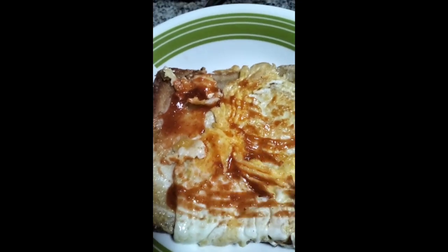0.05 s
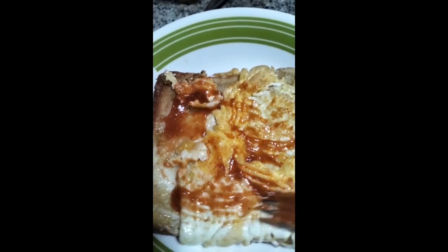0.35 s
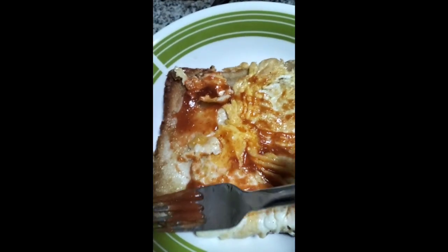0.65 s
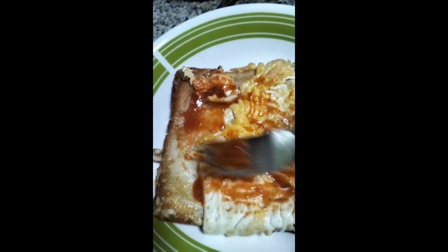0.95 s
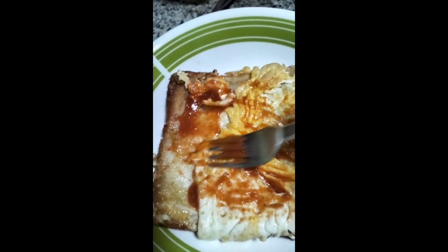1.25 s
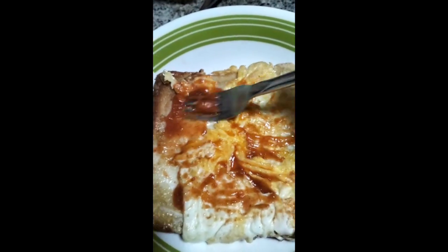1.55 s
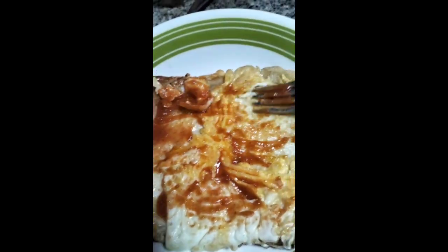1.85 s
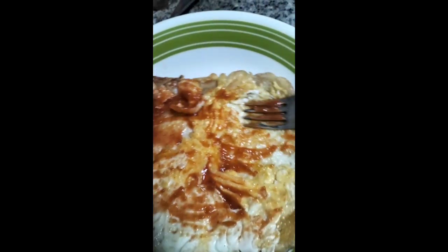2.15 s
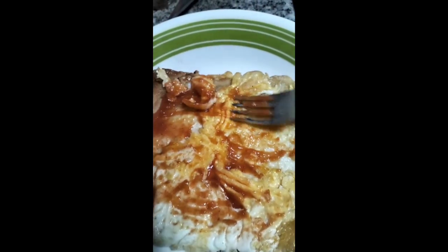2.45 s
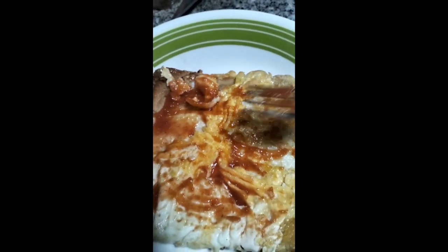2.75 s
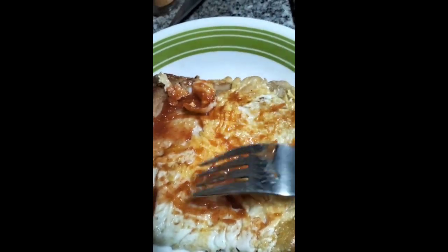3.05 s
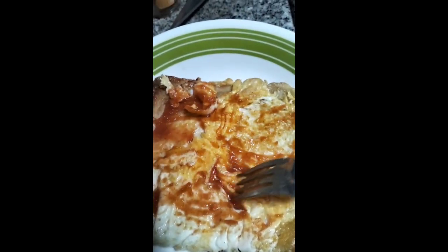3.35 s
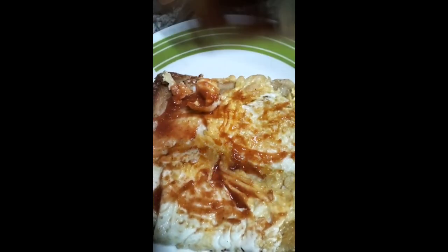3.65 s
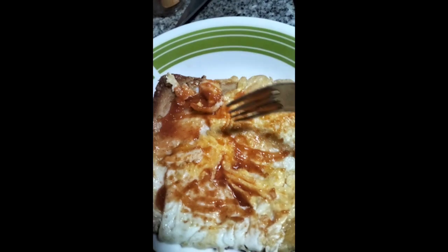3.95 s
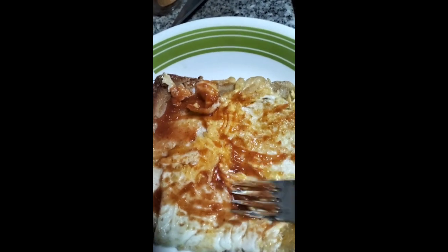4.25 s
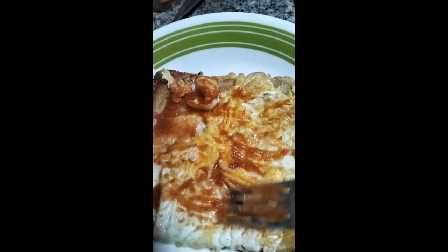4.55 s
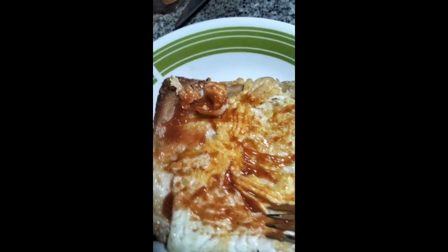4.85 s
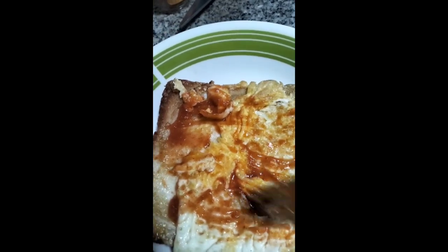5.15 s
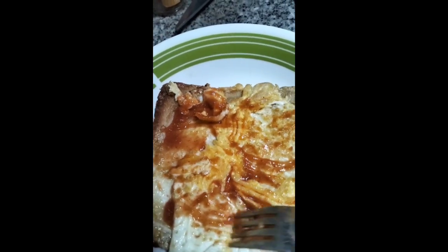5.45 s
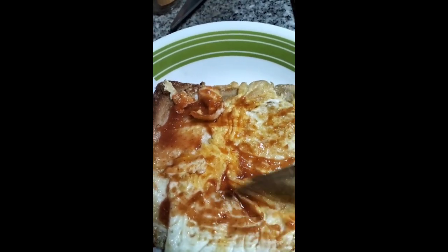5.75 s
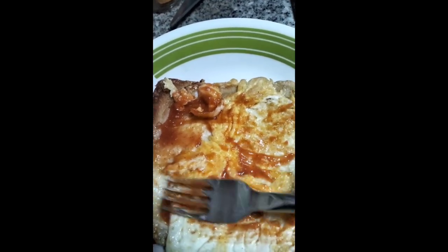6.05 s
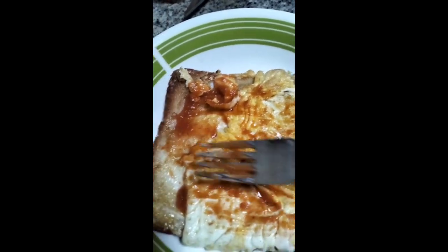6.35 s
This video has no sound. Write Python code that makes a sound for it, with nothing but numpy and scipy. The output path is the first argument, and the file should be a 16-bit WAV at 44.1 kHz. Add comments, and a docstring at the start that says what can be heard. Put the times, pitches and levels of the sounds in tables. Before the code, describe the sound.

Quiet squelches and light taps of a fork smearing sauce, with muffled knocks and a sharp clink on a ceramic plate.

```python
"""Small room, close to a ceramic plate: a fork spreads sauce over a soft, cheesy slice.
An appliance hums faintly behind. Pressing knocks the plate dully through the food; one hard fork
contact clinks and rings the plate's modes. The tines tap lightly, the sauce fizzes and squelches
under them, the food drags, and breaking sauce films give tiny wet ticks."""
import sys
import numpy as np
from scipy import signal
from scipy.fft import rfft, irfft
from scipy.io import wavfile
from scipy.ndimage import uniform_filter1d, minimum_filter1d

SR = 44100
rng = np.random.default_rng(int(sys.argv[2]) if len(sys.argv) > 2 else 0)


def transcribe(u):
    """Save the signal u as a 16-bit wav file named by the first command-line argument.

    u: samples, shape (n,) or (channels, n), limited to [-1, 1]; the rate is SR.
    q: integer samples, one column per channel.
    """
    v = np.clip(np.atleast_2d(u).T, -1, 1)
    q = np.round(v * 32767).astype(np.int16)
    wavfile.write(sys.argv[1], SR, q)


N = 291501

# plate and fork modes: f/Hz, level/dB, t60 without food damping/s, left-right/dB
PLATE_MODES = [(314.4, -38, 0.37, -0.5), (607, -29.5, 0.14, -1.5), (816, -35, 0.18, -2),
               (990, -36.5, 0.13, -7), (1186, -17, 0.13, -5.5), (1196, -23.5, 0.23, -0.5),
               (1490, -19, 0.11, 8.5), (1603, -29, 0.17, -2), (1800, -35, .14, 0), (2220, -20, .33, -6.5),
               (3127, -32.5, .28, -2.5), (4182, -31.5, .2, 1.5), (5394, -41, .17, -1), (6290, -44, .14, 3),
               (6830, -42, .16, 1), (7060, -48, .16, 0), (3167, -22.5, 0.029, -22.5), (8360, -46, 0.14, 2),
               (9290, -54, .16, 2), (9800, -48.5, .15, -3.5), (11260, -52.5, 0.11, -6.5),
               (12500, -44, 0.092, 1), (14500, -46, .16, 0)]
# strokes through the sauce: start/s, fastest/s, end/s, level/dB, drag offset/dB
FORK_STROKES = [(0, 0.068, 0.26, -69, -3), (0.466, .54, 0.69, -67.5, 4.5), (0.878, 1.0, 1.14, -65, 1.5),
                (1.31, 1.358, 1.48, -62, -2), (1.675, 1.781, 1.86, -66, -6),
                (1.824, 1.923, 2.114, -63.5, -4.5), (2.217, 2.394, 2.536, -55, -0.5),
                (2.654, 2.703, 2.95, -71.5, 5), (4.147, 4.198, 4.27, -69, 1),
                (4.847, 5.024, 5.08, -64.5, 3)]


def amp(db):
    """dB to gain."""
    return 10 ** (np.asarray(db) / 20)


def unit(x):
    """Scale to rms 1."""
    return x / np.sqrt(np.mean(x ** 2) + 1e-20)


def curve(points, hz):
    """Interpolate (f/Hz, value) points over log frequency."""
    f, value = np.transpose(points)
    return np.interp(np.log(hz + 1), np.log(f + 1), value)


def sides(pan_db):
    """Channel gains for a left-right level difference."""
    return amp(np.array([[.5], [-.5]]) * pan_db)


def add(mix, start_s, sound):
    """Mix a sound in at start_s."""
    part = mix[:, max(round(start_s * SR), 0):][:, :sound.shape[-1]]
    part += sound[..., :part.shape[1]]


def colour(x, points):
    """Filter by (f/Hz, level/dB) points."""
    hz = np.fft.rfftfreq(x.shape[-1], 1 / SR)
    return irfft(rfft(x) * amp(curve(points, hz)), x.shape[-1])


def pulse(shape_db, size=2048):
    """Minimum-phase click with spectrum shape_db(f), peak 1."""
    hz = abs(np.fft.fftfreq(size, 1 / SR))
    log_gain = np.log(amp(np.maximum(shape_db(hz), -100)))
    click = np.fft.ifft(np.exp(np.conj(signal.hilbert(log_gain)))).real[:size // 2]
    return click / abs(click).max()


def delay_right(x, lag_s):
    """Sound from the left reaches the right channel later."""
    turn = np.exp(-2j * np.pi * np.fft.rfftfreq(N, 1 / SR) * lag_s)
    return np.array([x[0], irfft(rfft(x[1]) * turn, N)])


def room(x, wet_db, early_db, early_s):
    """Direct sound, early reflections off the counter and nearby things, short stereo tail."""
    # reverberation: f/Hz, t60/s
    decay = [(150, 0.21), (500, 0.271), (1200, 0.19), (3000, 0.18), (7000, 0.19), (15000, 0.22)]
    age = np.arange(SR // 2) / SR
    echoes = rng.choice([-1., 1.], (2, len(age))) * (rng.random((2, len(age))) < .12)
    early = rng.standard_normal(echoes.shape) * np.exp(-age / early_s) * (age > .0015)
    build_up = np.clip(age / 0.0093 - .3, 0, 1)
    hz, t, spectra = signal.stft(echoes * build_up, SR, nperseg=256)
    fade = amp(-60 * t / curve(decay, hz)[:, None])
    tail = signal.istft(spectra * fade, SR, nperseg=256)[1][:, :len(age)]
    response = amp(wet_db) * tail / np.linalg.norm(tail[0])
    response += amp(early_db) * early / np.linalg.norm(early[0])
    return x + signal.fftconvolve(x, response, axes=1)[:, :N]


def appliance(air_db=-59, pan_db=-2, left_lag_s=0.00043):
    """Steady air noise, alike in both channels in the bass, with drone bands and a weak hum."""
    # room noise: f/Hz, relative level/dB
    air_spectrum = [(15, -38.5), (25, -17), (108, -3), (153, -7), (190, -5.5), (326, -7.5), (476, -12),
                    (641, -11), (695, -4.5), (863, -18.5), (1480, -16), (2160, -24.5), (8140, -48),
                    (14000, -36), (16000, -37)]
    # likeness of the channels: f/Hz, correlation
    coherence = [(60, 0.92), (130, 0.82), (290, 0.97), (640, -0.37), (1410, -0.087), (3100, 0.13),
                 (6820, 0.0051), (15000, -0.092)]
    # drone bands: f/Hz, width/Hz, level re room noise/dB
    drone_bands = [(125, 24, 4.5), (240, 15, 3), (331.7, 17, 7), (678, 51, 6.5), (1078, 480, 4),
                   (1494, 17, 12), (3160, 350, 5.5), (4520, 820, 3.5)]
    # hum lines: f/Hz, level/dB, left-right/dB
    hum_lines = [(100.6, -70.5, 5), (198.2, -69, 5), (246, -76, 1), (330, -70.5, 3.5),
                 (704.4, -64.5, -10.5), (916, -76.5, -5), (1155, -78, 10.5), (1515, -77, -10)]
    hz, t = np.fft.rfftfreq(N, 1 / SR), np.arange(N) / SR
    left, other = rfft(rng.standard_normal((2, N)))
    same = curve(coherence, hz)
    right = same * left + np.sqrt(1 - same ** 2) * other
    noise = np.array([left, right]) * amp(curve(air_spectrum, hz))
    drone_power = sum(amp(db) ** 2 / (1 + (2 * (hz - f) / width) ** 2) ** 1.8
                      for f, width, db in drone_bands)
    air = amp(air_db) * irfft(noise * np.sqrt(1 + drone_power), N) / irfft(noise, N).std()
    arrival = t - np.array([[left_lag_s], [0]])
    hum = sum(sides(pan) * amp(db) * np.sqrt(2) * np.sin(2 * np.pi * (f * arrival + rng.random()))
              for f, db, pan in hum_lines)
    return sides(pan_db) * (air + hum)


def plate_ring(corner_hz, damping, bass_hz=260):
    """Modes after one blow: a soft blow misses the high ones, food damps them."""
    t = np.arange(SR // 2) / SR
    tone = np.zeros((2, len(t)))
    for hz, db, t60, pan in PLATE_MODES:
        mode = amp(db - 60 * t * damping / t60) * np.sin(2 * np.pi * hz * t)
        tone += sides(pan) * mode / (1 + (hz / corner_hz) ** 4)
    # a small plate radiates almost no bass
    return signal.sosfilt(signal.butter(2, bass_hz, "highpass", fs=SR, output="sos"), tone)


def plate_gain_db(hz, width=0.018, valley_db=-12):
    """A crack's treble gathers at the modes; lower down, food and counter keep it broad."""
    peaks = sum(1 / (1 + ((hz - f) / (width * f)) ** 2) ** 2 for f, *_ in PLATE_MODES)
    treble = np.clip((hz - 4300) / 900, 0, 1)
    return treble * 10 * np.log10(amp(valley_db) ** 2 + peaks)


def plate_knocks(ring_db=-7, damping=1.6, cushion=0.43):
    """Dull blows through the food, each with a short, dark ring."""
    # cushioned blows: t/s, level/dB, low-pass corner/Hz, left-right/dB
    blows = [(0.4378, -41, 1400, 5), (0.4639, -21.5, 2000, 3.5), (0.5518, -33, 1480, -5.5),
             (0.5575, -35, 1260, 7), (1.29, -46, 1400, 5), (1.3615, -46, 890, 8), (1.6772, -41, 900, 2),
             (4.4618, -20.5, 2700, -0.5), (4.4838, -30.5, 1600, -1), (4.8166, -28.5, 1900, 2.5)]
    # blow spectrum before the low-pass: f/Hz, level/dB
    spectrum = [(80, -28), (250, -5), (480, -5.5), (660, 10), (950, 7), (1300, 6), (1900, 1.5), (2700, -11),
                (5000, -13.5), (8000, -17), (15000, -12)]
    out = np.zeros((2, N))
    for s, db, corner_hz, pan in blows:
        blow = pulse(lambda f: curve(spectrum, f) - 10 * np.log10(1 + (f / corner_hz) ** 2))
        add(out, s, amp(db) * sides(pan) * blow)
        add(out, s, amp(db + ring_db) * sides(pan) * plate_ring(corner_hz * cushion, damping))
    return room(out, wet_db=-6.5, early_db=-0.5, early_s=0.0039)


def fork_clink(crack_db=-1):
    """The fork hits and chatters; the hardest contact rings the plate."""
    # hard fork-plate contacts: t/s, level/dB, left-right/dB
    contacts = [(5.045, -2, 2), (5.05, -1.5, -9), (5.0530, -4.5, -3.5), (5.0571, -9.5, 3),
                (5.067, -15, -1.5), (5.105, -23, 4)]
    # broad spectrum of a contact: f/Hz, level/dB
    spectrum = [(40, -48.5), (140, -35), (280, -19), (500, -2), (1100, 5), (1700, 1.5), (2500, -5.5),
                (3400, -13), (4600, -19), (6800, -21.5), (8000, -27), (12500, -18.5), (14800, -22),
                (15800, -41)]
    cracks, tone = np.zeros((2, N)), np.zeros((2, N))
    crack = pulse(lambda f: curve(spectrum, f) + plate_gain_db(f))
    for s, db, pan in contacts:
        add(cracks, s, amp(db + crack_db) * sides(pan) * crack)
    hardest_s = max(contacts, key=lambda row: row[1])[0]
    add(tone, hardest_s, plate_ring(corner_hz=30000, damping=1))
    tone = delay_right(tone, lag_s=.00024)  # the rim lies further left than the tines
    return (room(cracks, wet_db=-8.5, early_db=-7.5, early_s=0.0032)
            + room(tone, wet_db=-16.5, early_db=-22, early_s=.009))


def snaps(rows, gain_db, spray_db, spray_s, q, pan_db):
    """Per (t/s, level/dB, f/Hz) row: one broad resonant click, then a spray of smaller ones."""
    out, t = np.zeros((2, N)), np.arange(SR // 50) / SR
    for s, db, hz in rows:
        click = pulse(lambda f: -10 * np.log10(1 + (q * (f / hz - hz / (f + 1))) ** 2))
        spray = rng.standard_normal((2, len(t))) * np.exp(-t / spray_s)
        spray *= amp(spray_db) / np.linalg.norm(spray, axis=1, keepdims=True)
        spray[:, 0] = 1  # leading click
        snap = signal.fftconvolve(spray, click[None], axes=1)
        add(out, s, amp(db + gain_db) * sides(pan_db) * snap / abs(snap).max())
    return out


def tine_taps():
    """The tines touch down with light, dry taps."""
    # taps: t/s, level/dB, centre f/Hz
    taps = [(0.845, -44.5, 4630), (0.998, -40.5, 4840), (1.0442, -44, 3050), (1.6776, -47, 5100),
            (1.9244, -49, 3800), (1.9644, -48, 4250), (2.2098, -38, 2960), (2.3965, -37.5, 5560),
            (2.7262, -38.5, 4840), (3.0595, -48, 3260), (4.4308, -34.5, 2570), (4.4363, -30, 2190),
            (4.4618, -33, 3160), (5.699, -33.5, 2600)]
    return snaps(taps, gain_db=1, spray_db=5.5, spray_s=0.0011, q=2.47, pan_db=3)


def film_ticks():
    """Sauce films snap with high, wet ticks."""
    # loudest snaps: t/s, level/dB, centre f/Hz
    ticks = [(0.0608, -45.5, 11300), (0.0687, -40.5, 10700), (0.1002, -52, 9720), (0.1286, -45.5, 11400),
             (0.177, -43, 12400), (0.2356, -45, 11800), (0.5037, -46, 11200), (0.5506, -36, 10400),
             (0.605, -50, 12200), (1.069, -47, 11200), (1.3608, -37.5, 11500), (1.4721, -41.5, 12800),
             (1.7429, -47.5, 11100), (2.0502, -52, 12700), (2.2398, -50.5, 9450), (2.7462, -49.5, 10500),
             (2.848, -51.5, 12200), (3.4358, -55, 13400), (3.4823, -52.5, 11200), (3.8508, -51, 11700),
             (4.5343, -48.5, 11200), (4.8738, -42, 12400), (5.235, -47.5, 12600)]
    return snaps(ticks, gain_db=6, spray_db=6.5, spray_s=0.00032, q=4, pan_db=1)


def small_film_ticks(count=4, reach=0.63, spread_db=2.5, centre_hz=9550, spread_oct=.3):
    """Lesser films break at random around each stroke's fastest moment."""
    rows = []
    for start, fastest, end, *_ in FORK_STROKES:
        early, late = reach * rng.random((count, 2)).T
        size, pitch = rng.standard_normal((count, 2)).T
        times_s = fastest - early * (fastest - start) + late * (end - fastest)
        rows += zip(times_s, spread_db * size, centre_hz * 2 ** (spread_oct * pitch))
    return snaps(rows, gain_db=-53.5, spray_db=0.5, spray_s=0.0004, q=2.55, pan_db=2)


def crackle(spectrum, per_s, spread_db, patchy_db):
    """Dense tiny snaps of uneven size, in clumps of changing pitch; rms 1."""
    size = amp(spread_db * np.minimum(rng.exponential(1, (3, N)), 4))
    polarity = rng.choice([-1., 1.], (3, N))
    grains = size * polarity * (rng.random((3, N)) < per_s / SR) / np.sqrt(per_s)
    spectra = signal.stft(grains[:2] + 0.63 * grains[2], nperseg=256)[2]  # third stream is shared
    clumps = uniform_filter1d(rng.standard_normal(spectra.shape[1:]), size=12, axis=0)
    clumps = unit(uniform_filter1d(clumps, size=3, axis=1))
    patchy = signal.istft(spectra * amp(patchy_db * clumps), nperseg=256)[1][:, :N]
    return unit(colour(patchy, spectrum))


def stroke_envelope(t, start, fastest, end, start_db=-13, end_db=-26.5, roundness=1.5):
    """The fork gathers speed, then slows and lifts."""
    before = np.clip((fastest - t) / (fastest - start), 0, 1)
    after = np.clip((t - fastest) / (end - fastest), 0, 1)
    arch = amp(start_db * before ** roundness + end_db * after ** roundness)
    return uniform_filter1d(arch * (t >= start) * (t <= end), size=600)


def sauce_smears(fizz_db=-0.5, drag_db=2, dab_drag_db=1, dab_rise_s=0.0067):
    """Sauce fizzes under the moving tines, the food below drags, flat landings squelch."""
    # fork landing flat in the sauce: t/s, level/dB
    dabs = [(0.433, -52), (0.841, -60.5), (1.270, -54.5), (4.425, -55.5)]
    # sauce fizz: f/Hz, relative level/dB
    fizz_spectrum = [(1500, -26.5), (3000, -5.5), (4500, -2), (6500, -4.5), (8000, -8), (11000, -2),
                     (14500, -0.5), (16000, -6)]
    # food drag: f/Hz, relative level/dB
    drag_spectrum = [(60, -21.5), (200, -9), (500, -5), (950, 1.5), (1600, -4), (2600, -14.5),
                     (4200, -16.5), (8000, -38)]
    t, fizz, drag = np.arange(N) / SR, np.zeros(N), np.zeros(N)
    for start, fastest, end, db, press_db in FORK_STROKES:
        level = amp(db) * stroke_envelope(t, start, fastest, end)
        fizz += amp(fizz_db) * level
        drag += amp(drag_db + press_db) * level
    for s, db in dabs:
        rise = np.maximum(t - s, 0) / dab_rise_s
        squelch = amp(db) * (rise * np.exp(1 - rise)) ** 2
        fizz += squelch
        drag += amp(dab_drag_db) * squelch
    grains_per_s = 270 + 2200 * fizz / amp(-60.5)  # louder fizz is denser
    return (fizz * crackle(fizz_spectrum, per_s=grains_per_s, spread_db=4, patchy_db=2.5)
            + drag * crackle(drag_spectrum, per_s=4000, spread_db=2.5, patchy_db=3.5))


def scene():
    """Plate, sauce and tines reach the left channel first; the appliance hums behind."""
    background = appliance()
    plate = plate_knocks() + fork_clink()
    spreading = sauce_smears() + film_ticks() + small_film_ticks() + tine_taps()
    near = plate + room(spreading, wet_db=-9.5, early_db=-5, early_s=0.0071)
    return background + delay_right(near, lag_s=0.000281)


def record(dry):
    """Fast peak limiter, then low-pass."""
    ceiling, edge_hz = .9, 15650
    gain = np.minimum(1, ceiling / (abs(dry).max(0) + 1e-9))
    held = dry * uniform_filter1d(minimum_filter1d(gain, size=89), size=89)
    lowpass = signal.firwin(511, edge_hz, window=("kaiser", 8), fs=SR)
    return signal.oaconvolve(held, lowpass[None], "same")


dry = scene()
out = record(dry)
transcribe(out)
```